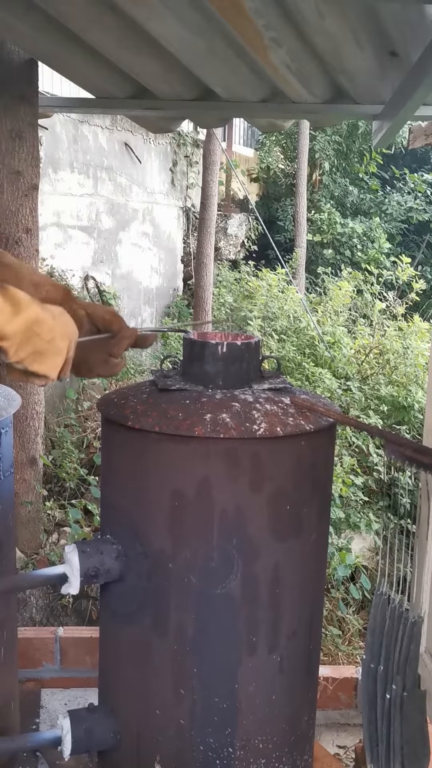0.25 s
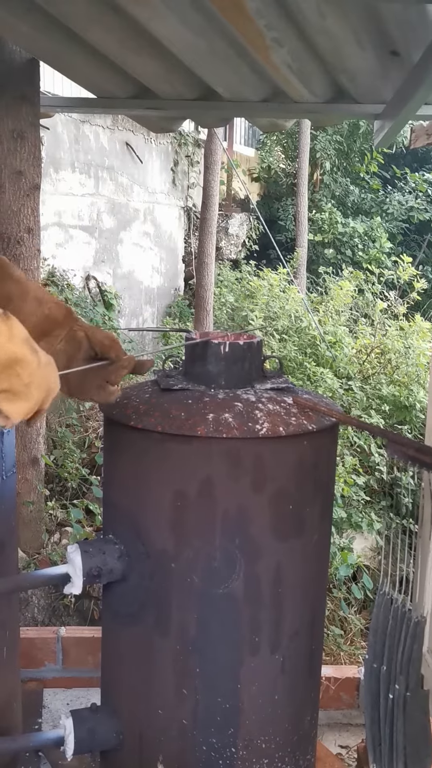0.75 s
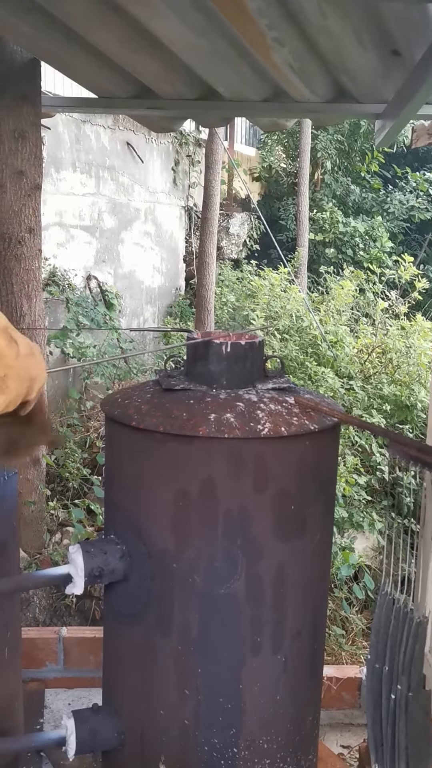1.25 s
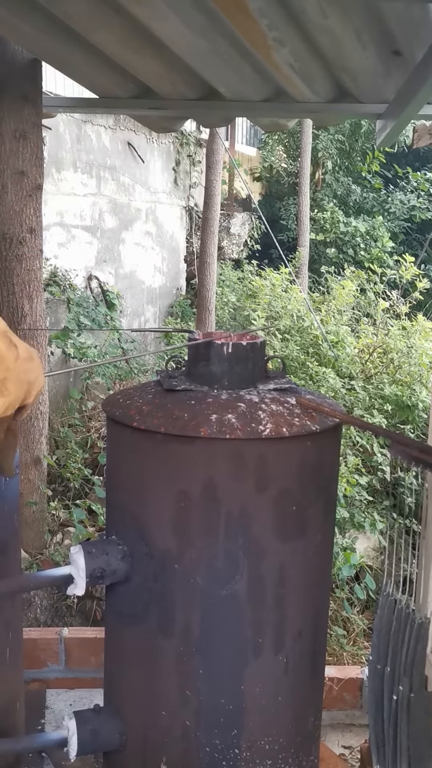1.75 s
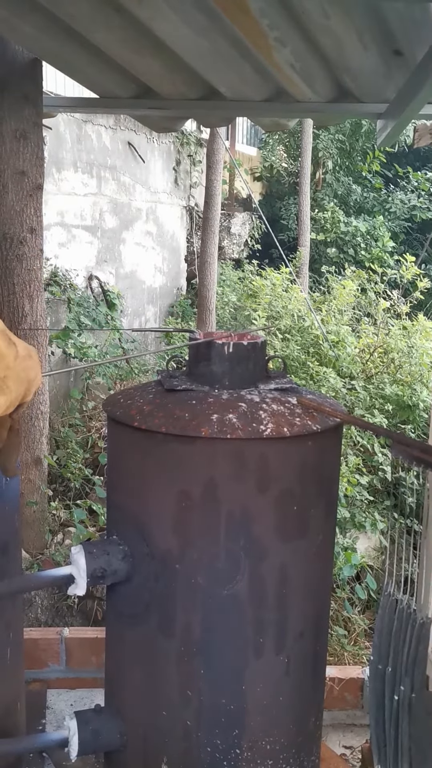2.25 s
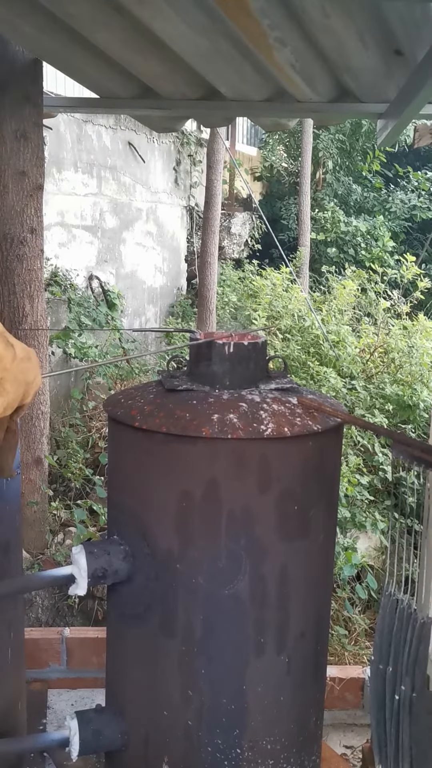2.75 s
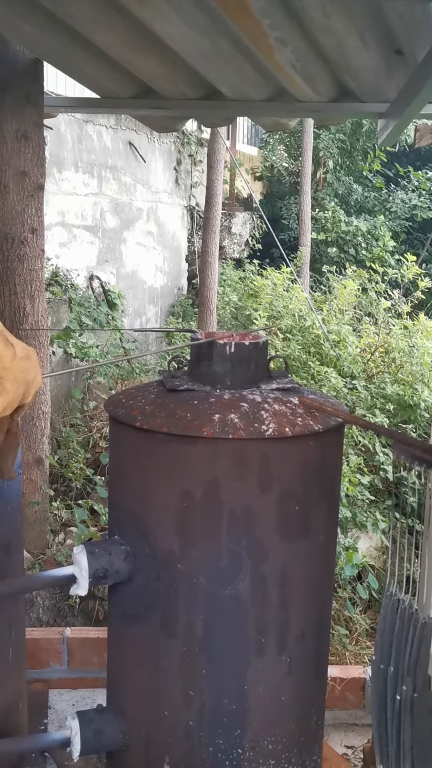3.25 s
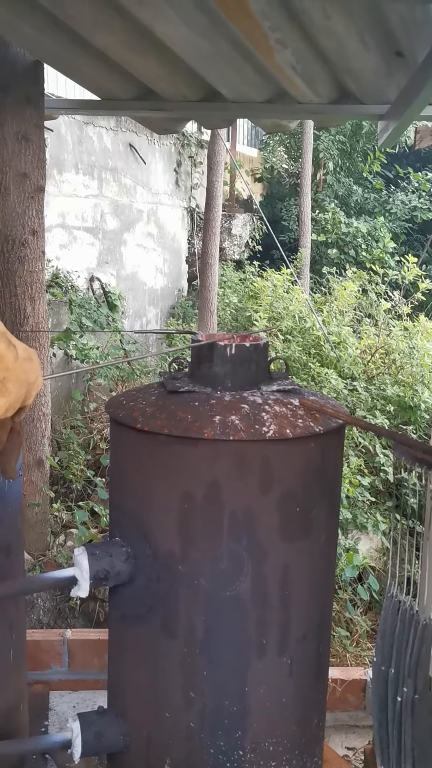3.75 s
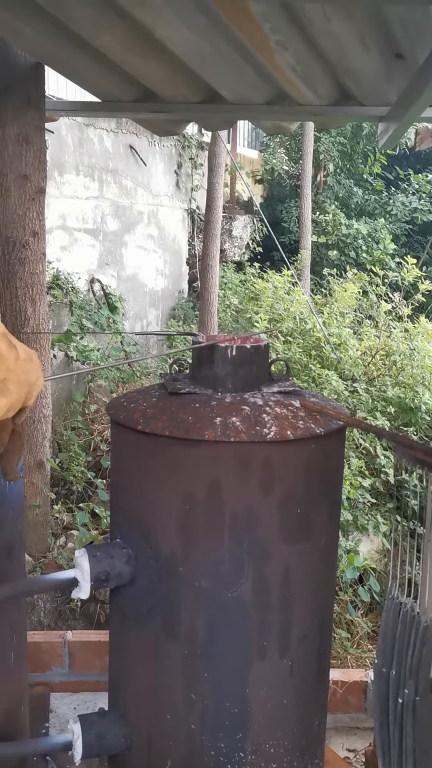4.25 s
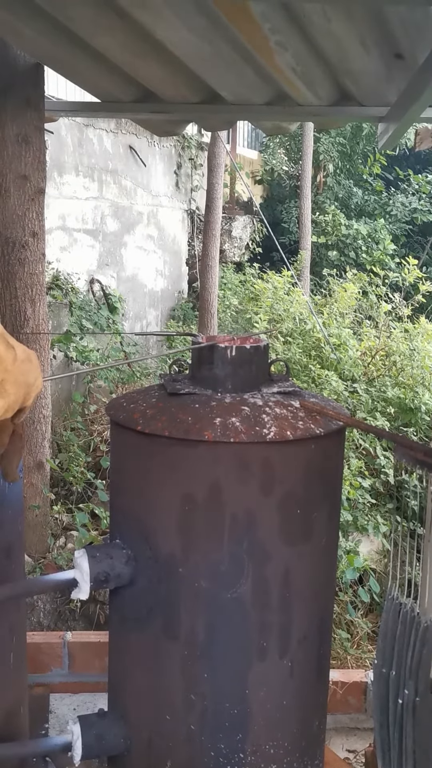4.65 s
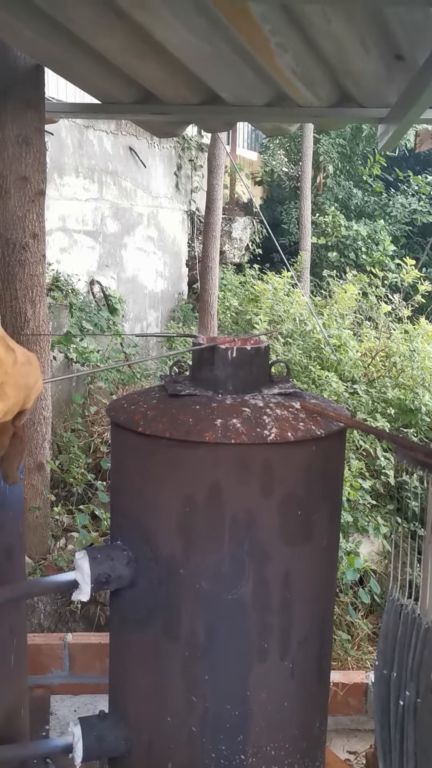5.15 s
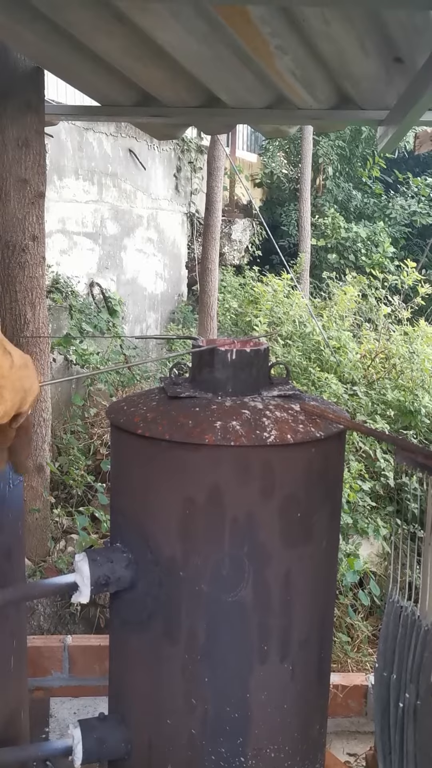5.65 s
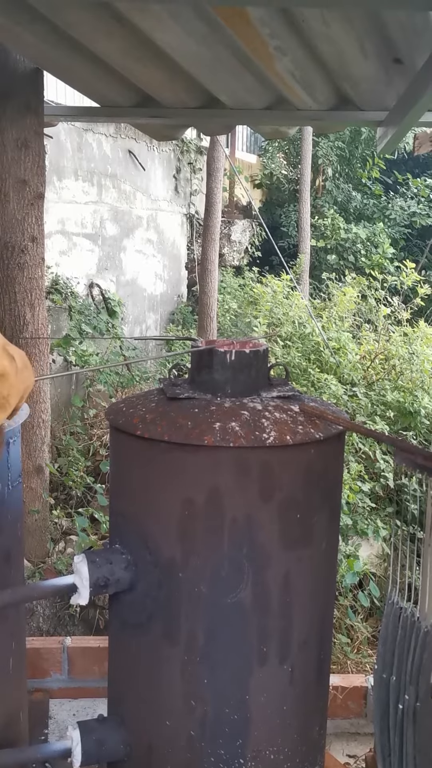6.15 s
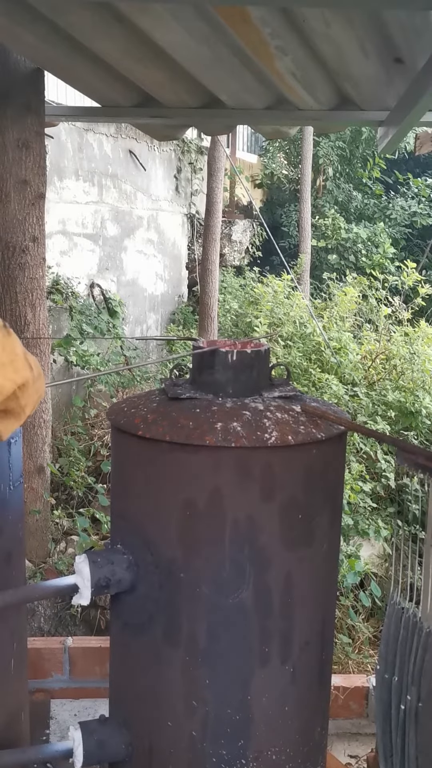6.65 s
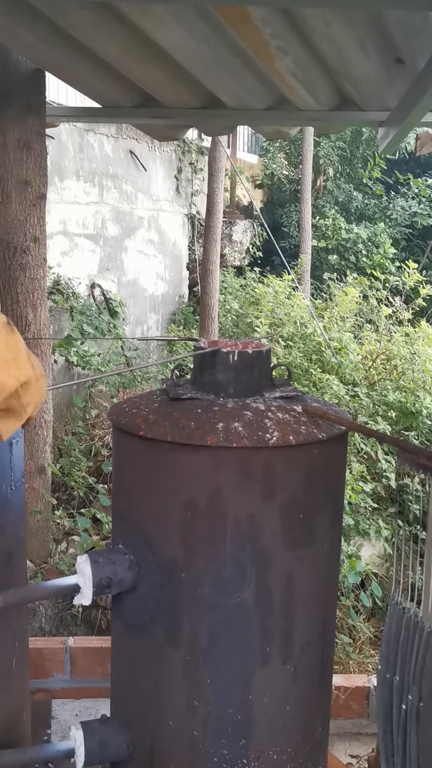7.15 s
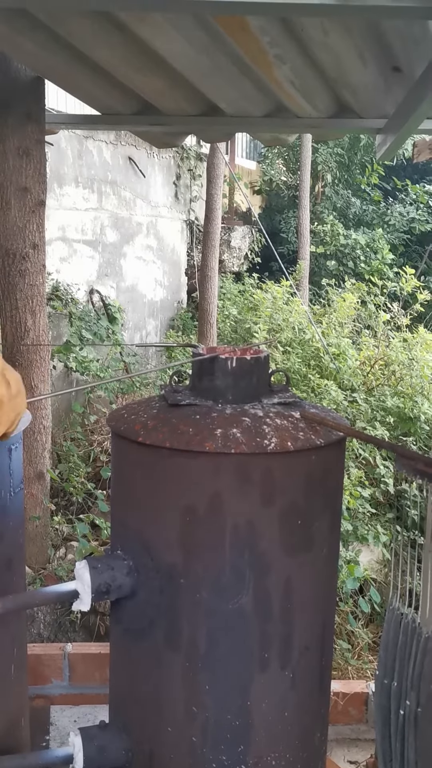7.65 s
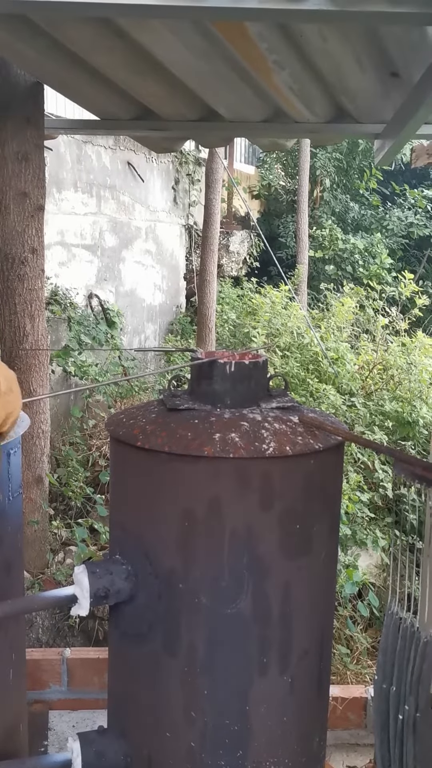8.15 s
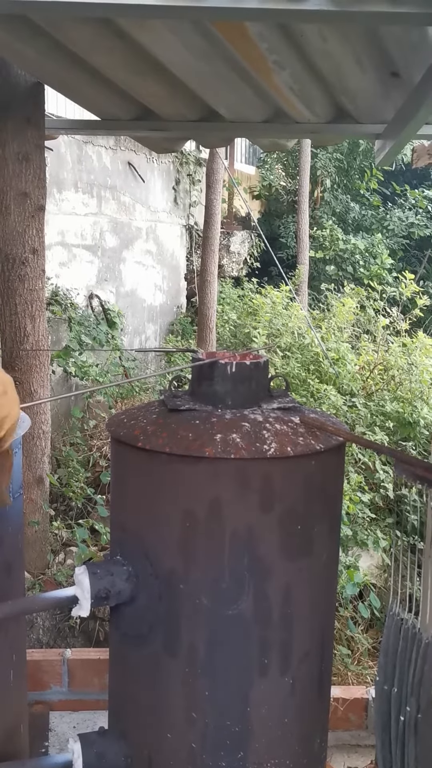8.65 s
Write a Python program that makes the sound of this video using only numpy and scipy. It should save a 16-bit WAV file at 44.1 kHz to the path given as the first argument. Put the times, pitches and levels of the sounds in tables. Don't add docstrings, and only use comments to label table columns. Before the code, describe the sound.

In a quiet yard under a tin shelter, faint ticks of a glove and valve and a low pilot flame are heard. A bright snap releases gas, which lights with a deep thump in a steel drum. A loud, bassy roar with fluttering midrange and sharp hiss holds for seven seconds, then shuts off with a tiny upward whoop, leaving soft murmur. Close stereo microphone outdoors.

```python
import sys
import numpy as np
from scipy import signal
from scipy.fft import rfft, irfft, next_fast_len
from scipy.io import wavfile
from scipy.ndimage import uniform_filter1d

SR = 44100
rng = np.random.default_rng(int(sys.argv[2]) if len(sys.argv) > 2 else 0)


def unload_audio(sound):
    columns = np.transpose(np.atleast_2d(sound))
    steps = np.round(np.clip(columns, -1, 1) * 32767)
    wavfile.write(sys.argv[1], SR, steps.astype(np.int16))


def convert_level_to_amplitude(level_db):
    exponent = np.asarray(level_db, float) / 20
    return 10 ** exponent


N = 393213
TIME = np.arange(N) / SR
SNAP_S, LIGHT_S = 0.7672, 0.831
STRIDE = 8


def evened(x):
    return x / np.sqrt(np.mean(x ** 2) + 1e-20)


def read(points, hz):
    f, value = np.transpose(points)
    return np.interp(np.log(hz + 1), np.log(f + 1), value)


def level(rows):
    s, db = np.transpose(rows)
    return convert_level_to_amplitude(np.interp(TIME, s, db, -150, -150))


def wander(top_hz):
    t = np.arange(0, N + 64, 64) / SR
    hz = np.geomspace(top_hz / 12, top_hz, 30)
    phase = rng.random(30)
    sines = np.sin(2 * np.pi * (hz * t[:, None] + phase))
    drift = (sines / np.sqrt(hz)).sum(1)
    return np.interp(TIME, t, evened(drift))


def swells(rows):
    t = np.arange(0, N + 64, 64) / SR
    humps = 0
    for middle, height, length in rows:
        bell = np.cos(np.pi * np.clip((t - middle) / length, -0.5, 0.5)) ** 2
        humps = humps + height * np.minimum(1.7 * bell, 1)
    return np.interp(TIME, t, humps)


def after(s, t60, rise_s):
    t = np.maximum(TIME - s, 0)
    return (1 - np.exp(-t / rise_s)) * convert_level_to_amplitude(np.maximum(-60 * t / t60, -200))


def gas(start, full_db, short_db, settle_s, creep_db, dies_s, fall_db):
    since = np.maximum(TIME - start, 0)
    db = full_db + short_db * np.exp(-since / settle_s) + creep_db * since
    db = db - fall_db * np.maximum(TIME - dies_s, 0)
    return (TIME > start) * convert_level_to_amplitude(np.maximum(db, -200))


def air(bed, modes=(), sharp=1.0):
    # f/Hz, coherence
    likeness = [(60, .998), (160, .985), (270, .86), (450, .68), (900, .42), (2000, .42), (4000, .4),
                (15000, .3)]
    size = next_fast_len(N)
    hz = np.fft.rfftfreq(size, 1 / SR)
    coarse = hz[::STRIDE]
    power = convert_level_to_amplitude(2 * read(bed, coarse))
    for f, bandwidth, db in modes:
        power = power + convert_level_to_amplitude(2 * db) / (1 + (2 * (coarse - f) / bandwidth) ** 2) ** sharp
    power = np.interp(hz, coarse, power)
    a, b, c, d = rng.standard_normal((4, len(hz)))
    common, separate = a + 1j * b, c + 1j * d
    same = np.clip(read(likeness, hz), 0, 1)
    spectra = np.array([common, same * common + np.sqrt(1 - same ** 2) * separate])
    pair = irfft(np.sqrt(power) * spectra, size)[:, :N]
    return pair / np.sqrt(np.mean(pair ** 2))


def steadied(pair, share, window_s):
    window = int(window_s * SR)
    power = uniform_filter1d(uniform_filter1d(pair.mean(0) ** 2, window), window)
    pair = pair / (abs(power) + 0.13) ** (np.clip(share, 0, 1) / 2)
    return pair / np.sqrt(np.mean(pair.mean(0) ** 2))


def drum_mode():
    # f/Hz, width/Hz, level/dB
    lowest_modes = [(65.2, 15, 6.5), (45, 13, -25)]
    # full level/dB, start offset/dB, settling/s, creep/(dB/s), fall starts t/s, fall/(dB/s)
    main_gas = (-28, -12, .06, 0.1, 7.87, 500)
    # middle t/s, top level/dB, length/s
    surge_rows = [(1.02, -21, .16), (1.16, -23, .22), (1.35, -16, .15), (1.5, -21.5, .16), (1.67, -16, .2),
                  (1.95, -22, .4), (2.3, -16, .26), (2.48, -20.5, .13), (2.88, -18, .24),
                  (3.04, -19.5, .14), (3.22, -22.5, .2), (3.41, -22, .16), (3.89, -15, .14),
                  (4.07, -23, .2), (4.24, -21.5, .2), (4.5, -19, .2), (4.65, -20, .12), (4.77, -17, .12),
                  (4.98, -19, .36), (5.17, -20, .14), (5.33, -20, .2), (5.72, -17, .2), (5.87, -15, .16),
                  (6.1, -17, .2), (6.32, -16.5, .16), (6.46, -17, .13), (6.7, -16, .36), (7.21, -14.5, .44),
                  (7.51, -13, .16), (7.76, -16, .3)]
    # middle t/s, top level/dB, length/s
    puff_rows = [(.06, -42, .3), (.49, -43, .12), (.68, -45, .14), (8.57, -50, .3), (8.8, -54, .3)]
    lowest = air([(20, -44), (200, -90), (1000, -130)], lowest_modes, sharp=1.57)
    surges = swells([(s, convert_level_to_amplitude(db - 3.3), length) for s, db, length in surge_rows])
    puffs = swells([(s, convert_level_to_amplitude(db), length) for s, db, length in puff_rows])
    pilot_hum = convert_level_to_amplitude(np.where(TIME < LIGHT_S, -49, -54.5))
    drive = np.hypot(gas(LIGHT_S, *main_gas), surges) + np.hypot(pilot_hum, puffs)
    return drive * steadied(lowest, 0.85, 0.05)


def upper_drum_modes():
    # f/Hz, width/Hz, level/dB
    roar_modes = [(99.6, 8.8, -0.5), (127.5, 15.1, -3), (138.7, 15.7, -7)]
    # f/Hz, level/dB
    roar_bed = [(15, -38), (30, -7), (45, -16.5), (150, -49), (200, -50), (400, -92)]
    # f/Hz, width/Hz, level/dB
    blare_modes = [(176.5, 19, -5.5), (193.3, 33, 2), (226.7, 15.5, -5.5), (249, 14.6, -7),
                   (307.5, 19, -14), (328.5, 13.5, -13.5), (376, 8.9, -21.5), (397, 11, -18.5)]
    # f/Hz, level/dB
    blare_bed = [(100, -60), (150, -20), (280, -26), (450, -28), (800, -56), (2000, -100)]
    # full level/dB, start offset/dB, settling/s, creep/(dB/s), fall starts t/s, fall/(dB/s)
    roar_gas = (-28, -8, .03, -0.15, 7.76, 190)
    # same columns, level/dB, offset/dB, settling/s, creep/(dB/s), t/s, fall/(dB/s)
    blare_gas = (-35, -14, .1, -0.15, 7.79, 230)
    # middle t/s, depth/dB, length/s
    lulls = [(1.15, 4, .4), (2.07, 3, .2), (3.3, 4, .2), (4.23, 4, .12), (4.46, 6, .2), (6.02, 7, .5),
             (6.46, 9, .2), (7.11, 7, .3), (7.53, 8, .25)]
    lull_db = swells(lulls)
    roar = steadied(air(roar_bed, roar_modes, sharp=1.25), 0.3, 0.047)
    blare = steadied(air(blare_bed, blare_modes, sharp=1.27), 0.3, 0.14)
    roar = gas(LIGHT_S, *roar_gas) * convert_level_to_amplitude(-lull_db) * roar
    return roar + gas(LIGHT_S, *blare_gas) * convert_level_to_amplitude(-0.45 * lull_db) * blare


def burner_tube():
    # f/Hz, width/Hz, level/dB
    tube_modes = [(407, 10, -12.5), (527, 30.3, 0.5), (638, 100, -14.5), (797, 16, -9.5), (1038, 57, -4.5),
                  (1368, 110, -13.5), (1451, 36, -5), (1835, 56, -4), (2237, 200, -10), (2377, 43, -18.5),
                  (2637, 19, -7), (2868, 13.4, -14), (2950, 18, -13.5), (3000, 58, -14.5), (3335, 41, -14)]
    # f/Hz, level/dB
    tube_bed = [(250, -18.5), (400, -14.5), (700, -24), (1200, -17), (2000, -18), (3000, -16.5),
                (3400, -24.5), (3600, -49)]
    tube_gas = (-42.8, -8, .12, -0.12, 7.81, 185)
    flutter = convert_level_to_amplitude(0.97 * wander(14))
    return gas(LIGHT_S, *tube_gas) * flutter * air(tube_bed, tube_modes, sharp=1.28)


def gas_jet():
    # f/Hz, width/Hz, level/dB
    jet_modes = [(4120, 53, 2), (4930, 90, -5), (4560, 90, -25), (5558, 450, 1), (6548, 180, 0.5),
                 (7700, 210, -8)]
    # f/Hz, level/dB
    jet_bed = [(3200, -62), (3450, -11), (3700, -6), (4700, -9), (5200, -16), (6200, -6), (7300, -10),
               (8300, -23), (8600, -60)]
    # f/Hz, width/Hz, level/dB
    fizz_modes = [(8930, 350, 2.5), (9500, 550, -5), (10830, 200, 5.5), (10900, 450, -2), (12350, 73, -3),
                  (12700, 240, -6), (15200, 640, -2.5)]
    # f/Hz, level/dB
    fizz_bed = [(8100, -50), (8400, -18.5), (10000, -9.5), (12500, -8), (13800, -10), (16000, -20.5)]
    # full level/dB, start offset/dB, settling/s, creep/(dB/s), fall starts t/s, fall/(dB/s)
    hiss_gas = (-48.8, -12, .16, 0.1, 7.75, 140)
    # same columns, level/dB, offset/dB, settling/s, creep/(dB/s), t/s, fall/(dB/s)
    fizz_gas = (-46.3, -13, .14, 0.2, 7.75, 240)
    hiss = gas(SNAP_S, *hiss_gas) * air(jet_bed, jet_modes, sharp=1.05)
    fizz = gas(SNAP_S, *fizz_gas) * air(fizz_bed, fizz_modes, sharp=1.05)
    return (hiss + fizz) * convert_level_to_amplitude(0.55 * wander(14))


def ignition_thump():
    # t/s, level/dB
    thump = [(.831, -40), (.838, -16), (.845, -10), (.855, -8), (.863, -18), (.886, -17), (.9, -24),
             (.94, -36)]
    crest_s = 0.8545
    return level(thump) * np.cos(2 * np.pi * 64 * (TIME - crest_s))


def valve_snap():
    # f/Hz, level/dB
    snap_bed = [(1500, -40), (2500, -19), (3300, -24), (4300, -17), (4800, -13), (7000, -2), (12000, -8),
                (13000, -12), (16000, -24)]
    # f/Hz, width/Hz, level/dB
    snap_modes = [(3520, 280, -8), (4750, 360, -3.5), (5800, 820, -15), (8600, 430, 1), (10500, 550, 1.5)]
    snap = convert_level_to_amplitude(-22.5) * after(SNAP_S, t60=0.035, rise_s=0.0003)
    rush = convert_level_to_amplitude(-33) * after(SNAP_S, t60=0.41, rise_s=0.0025)
    return (snap + rush) * air(snap_bed, snap_modes)


def whoop():
    # t/s, f/Hz, level/dB
    glide = [(7.805, 540, -70), (7.83, 580, -41), (7.855, 640, -34), (7.875, 685, -43), (7.9, 700, -50),
             (7.935, 715, -51), (7.96, 715, -75)]
    # f/Hz, width/Hz, level/dB
    whoop_modes = [(1130, 82, -10), (1580, 110, -5), (2065, 130, -3), (2650, 78, -8), (2900, 120, -17)]
    # t/s, level/dB
    upper_curve = [(7.82, -70), (7.84, -42), (7.87, -43.5), (7.9, -57), (7.94, -71)]
    s, hz, db = np.transpose(glide)
    phasor = np.exp(2j * np.pi * np.cumsum(np.interp(TIME, s, hz)) / SR)
    rough = signal.lfilter([1], [1, -np.exp(-np.pi * 30 / SR)], rng.standard_normal((2, N)), axis=1)
    lowest = (phasor * (1 + 0.3 * evened(rough[0]) + 0.3j * evened(rough[1]))).real
    upper = air([(100, -90), (16000, -90)], whoop_modes, sharp=2.0)
    return level(np.transpose([s, db])) * lowest + level(upper_curve) * upper


def pilot_flame():
    # f/Hz, level/dB
    pilot_bed = [(10, -21), (25, 17), (40, -7), (55, 8), (90, -37), (200, -100)]
    return convert_level_to_amplitude(-53) * air(pilot_bed)


def insect():
    # f/Hz, width/Hz, level/dB
    song_band = [(8940, 240, 0)]
    song = air([(100, -87), (16000, -90)], song_band, sharp=2.0)
    since = TIME - 0.09
    throb_hz, quicken_hz_per_s = 7.857, 0.045
    throb = np.sin(np.pi * (throb_hz + quicken_hz_per_s * since / 2) * since) ** 2
    return convert_level_to_amplitude(-68 - 9 * throb) * song


def handling_ticks():
    # t/s, peak level/dB, t60/s, ring f/Hz, ring level/dB, left minus right/dB
    tick_rows = [(.04, -52, 0.0073, 3000, -70, 4), (.478, -60, .12, 8950, -80, 0),
                 (.562, -53, 0.045, 13000, -55, -3)]
    scrape = air([(300, -40), (2000, -2), (8000, -2), (16000, -6)])
    out = np.zeros((2, N))
    for s, db, t60, hz, ring_db, pan_db in tick_rows:
        ring = convert_level_to_amplitude(ring_db) * np.sin(2 * np.pi * hz * TIME) * after(s, 1.6 * t60, 0.0005)
        tick = convert_level_to_amplitude(db) * scrape * after(s, t60, t60 / 30) + ring
        out += tick * convert_level_to_amplitude([[pan_db / 2], [-pan_db / 2]])
    return out


def yard():
    # f/Hz, level/dB
    murmur_bed = [(47, -29), (80, -5.5), (119, -10), (289, -9.5), (451, -19), (768, -14.5), (1490, -25),
                  (2180, -26.5), (7530, -45.5), (8990, -32), (10000, -41), (13100, -48), (16000, -54)]
    return convert_level_to_amplitude(-53.5 + 0.7 * wander(20)) * air(murmur_bed)


def shelter(pair):
    # f/Hz, width/Hz, depth/dB
    cancel = [(83.7, 5.1, 5.5), (88.5, 2.4, 4.5), (114.8, 2.7, 0.5), (160.6, 4.9, 14.5), (219, 4.4, 6.5),
              (232, 5.5, 10), (282, 8.1, 1), (291.5, 6.8, 1), (320.7, 10, 5), (460, 10, 3), (476, 11, 1),
              (735.6, 20, -0.5), (892, 36, 6.5), (1497, 43, 0), (1990, 90, 4), (2846, 35, -7.5),
              (3380, 72, -4.5), (3520, 160, 6), (4280, 81, 4), (4730, 100, 6), (6170, 100, 5),
              (7330, 260, 7), (13850, 360, 0)]
    # left delay t/s, right delay t/s, level/dB
    echo_rows = [(.0021, .0034, -14), (.0052, .0043, -15), (.0087, .0071, -16), (.0133, .0118, -17),
                 (.019, .0224, -18)]
    # f/Hz, left minus right/dB
    lean_rows = [(60, 4.5), (110, 2.5), (200, 4), (380, -1), (700, -1), (1290, 0.5), (2380, 0.5),
                 (4400, -5), (8120, -1.8), (15000, -7.5)]
    left_late_s = 0.0002423
    size = next_fast_len(N + SR)
    hz = np.fft.rfftfreq(size, 1 / SR)
    coarse = hz[::STRIDE]
    dips = 1
    for f, bandwidth, depth_db in cancel:
        dips = dips * (1 - (1 - convert_level_to_amplitude(-depth_db)) / (1 + 2j * (coarse - f) / bandwidth))
    dips = np.interp(hz, coarse, dips)
    echoes = 0
    for left, right, db in echo_rows:
        echoes = echoes + convert_level_to_amplitude(db) * np.exp(-2j * np.pi * np.outer([left, right], hz))
    echoed = 1 + echoes / (1 + (900 / (hz + 1)) ** 4)
    lean = convert_level_to_amplitude(read(lean_rows, hz) / 2)
    ports = np.array([lean * np.exp(-2j * np.pi * hz * left_late_s), 1 / lean])
    return irfft(rfft(pair, size) * dips * ports * echoed, size)[:, :N]


def scene():
    fire = drum_mode() + upper_drum_modes() + burner_tube() + gas_jet()
    events = ignition_thump() + valve_snap() + whoop()
    background = pilot_flame() + insect() + handling_ticks() + yard()
    return shelter(fire + events + background)


def roll_off(x):
    return signal.sosfilt(signal.butter(12, 15830, fs=SR, output="sos"), x)


def record(dry):
    bass_cut = signal.butter(N=2, Wn=24, btype="high", fs=SR, output="sos")
    return roll_off(signal.sosfilt(bass_cut, dry))


dry = scene()
out = record(dry)
unload_audio(out)
```